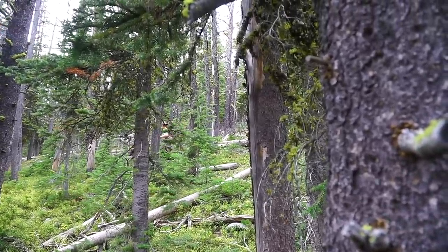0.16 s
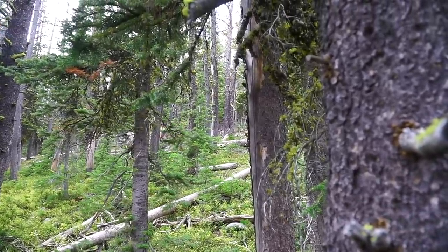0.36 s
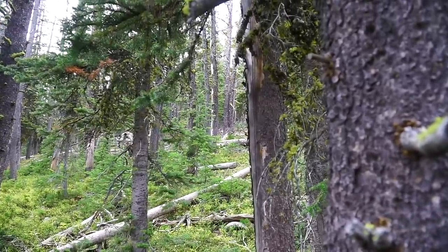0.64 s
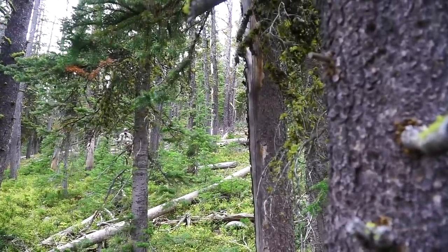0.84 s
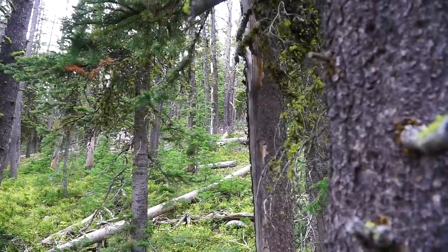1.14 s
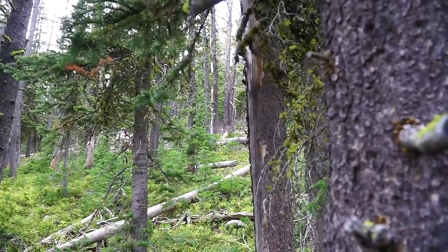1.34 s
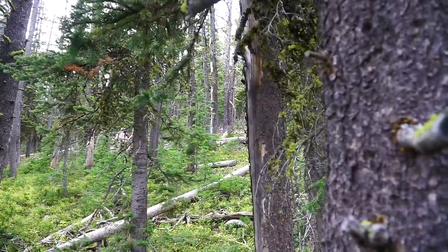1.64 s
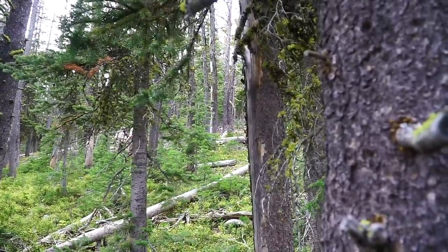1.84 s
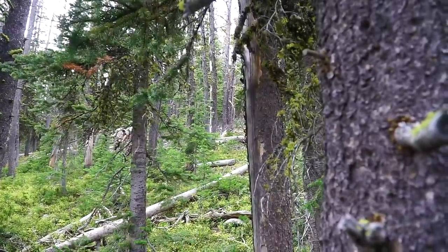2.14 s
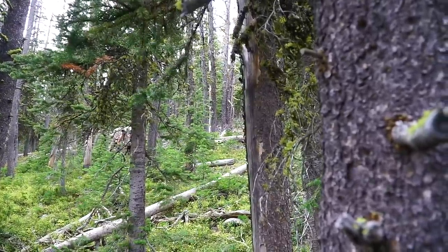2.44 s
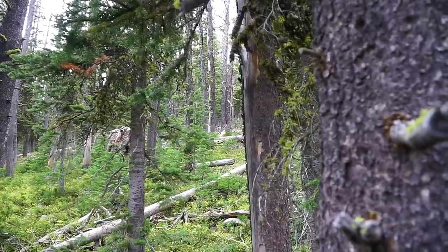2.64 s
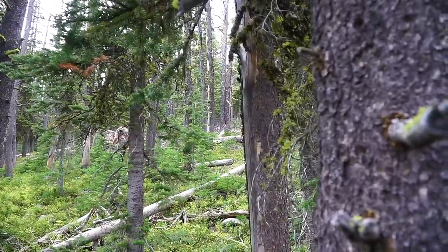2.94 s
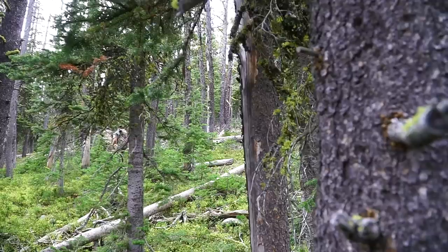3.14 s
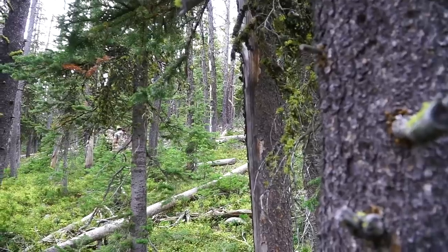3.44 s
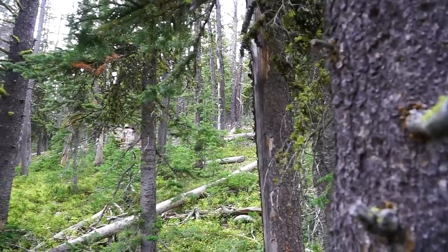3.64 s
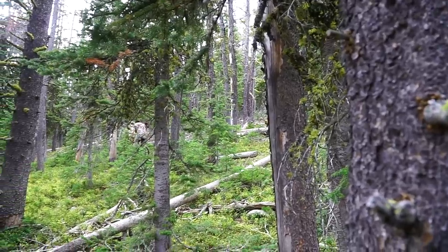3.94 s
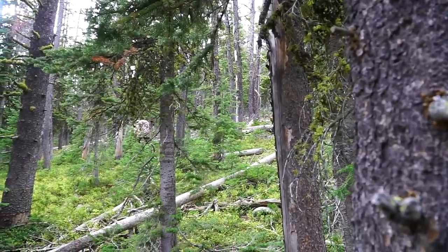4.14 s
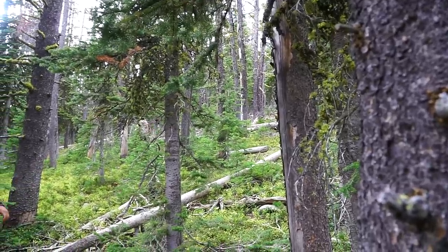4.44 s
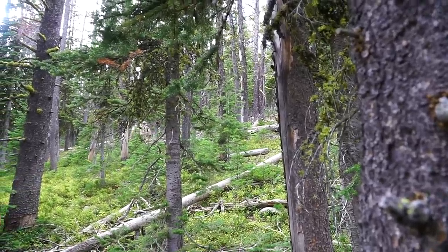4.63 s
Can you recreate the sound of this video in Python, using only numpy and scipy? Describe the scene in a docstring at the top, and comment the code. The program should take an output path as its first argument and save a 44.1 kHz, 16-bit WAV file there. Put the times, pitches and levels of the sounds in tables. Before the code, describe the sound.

A high elk call drops sharply in pitch, then two softer calls hold and fall, over faint brush rustle and small clicks.

```python
"""Three mews like a cow elk's, probably from a hunter's mouth call, sound among conifers: a thin tone,
held near 1.5 kHz, that then falls and turns rough, steeply and loudly in the first mew.
Close by, brush and cloth rustle, twigs tick and something hollow is knocked. Trunks and ground echo
the mews and the ticks. A deep rumble lies under a faint hiss of air."""
import sys
import numpy as np
from scipy import signal
from scipy.io import wavfile
from scipy.ndimage import uniform_filter1d

SR = 44100
rng = np.random.default_rng(int(sys.argv[2]) if len(sys.argv) > 2 else 0)


def waveform_to_disk(signal):
    """Save audio, clipped to [-1, 1], as 16-bit WAV at the path in sys.argv[1]."""
    frames = np.transpose(np.atleast_2d(signal))
    scaled = np.clip(frames, -1, 1) * 32767
    samples = np.round(scaled).astype(np.int16)
    wavfile.write(sys.argv[1], SR, samples)


N = 211062

# The calls, one list per mew. A partial is a pure tone at a whole multiple of the pitch.
# (time [s], pitch [Hz], first partial [dB], second partial [dB], third partial [dB], high whine [dB])
MEWS = [
    [(1.293, 1393, -50, -44, -60, -70), (1.305, 1403, -36.5, -49, -63.5, -67),
     (1.36, 1420, -38, -49.5, -52, -73), (1.385, 1442, -54, -48.5, -61, -72),
     (1.41, 1459, -39.5, -49.5, -56, -64), (1.475, 1440, -33.5, -43, -52, -53.5),
     (1.5, 1383, -18, -28, -60, -53), (1.532, 1057, -8, -25.5, -29, -57),
     (1.543, 1001, -10.5, -24, -19.5, -52), (1.562, 882, -6, -25.5, -21, -56),
     (1.587, 688.3, -24.5, -23, -25, -45), (1.61, 600.6, -15.5, -17, -36.5, -50),
     (1.632, 528, -36.5, -35, -45, -52), (1.647, 479.6, -25.5, -27.5, -38.5, -55),
     (1.68, 345, -46, -55, -39, -86)],
    [(2.64, 1124, -60, -56, -64, -70), (2.665, 1246, -42, -69, -67, -76),
     (2.685, 1327, -51, -62, -69.5, -79), (2.695, 1332, -38, -66, -76, -79),
     (2.72, 1349, -31.5, -68, -69.5, -77), (2.745, 1405, -27, -68.5, -77, -76),
     (2.775, 1478, -35.5, -69, -77, -76), (2.85, 1477, -33.5, -75, -82, -73),
     (2.99, 1577, -22.5, -49.5, -70, -72), (3.052, 1564, -23, -48.5, -69, -73),
     (3.087, 1378, -22.5, -55, -72, -72), (3.103, 1260, -31.5, -49, -50, -64),
     (3.13, 1076, -28, -55, -67, -71), (3.165, 940, -57, -47, -56, -70)],
    [(3.59, 1244, -49, -57, -63, -74), (3.62, 1290, -49, -56, -64, -66),
     (3.632, 1383, -28.5, -56, -63, -65), (3.65, 1434, -28.5, -56, -59, -63),
     (3.69, 1473, -30.5, -51, -58, -66), (3.77, 1410, -33, -53, -64, -73), (3.81, 1416, -39, -51, -65, -72),
     (3.89, 1493, -29, -48, -55, -70), (3.94, 1477, -27.5, -43.5, -61, -72),
     (3.965, 1372, -32.5, -56, -70, -64), (3.98, 1285, -52, -45, -61, -63),
     (4.0, 1200, -39.5, -48.5, -62, -67), (4.025, 1034, -42, -35, -55, -67),
     (4.045, 955, -46, -57, -58, -68), (4.062, 905, -52, -34.5, -61, -63), (4.11, 778, -57, -39, -60, -77),
     (4.15, 700, -58, -46, -74, -82)],
]
# Colour of the call's upper partials and breath: (frequency [Hz], relative level [dB])
CALL_COLOUR = [(900, 18), (1300, -5.5), (1700, -15.5), (2300, -1), (2650, -2.5), (3050, 3), (3600, -18.5),
               (4000, -13), (4500, -9), (5000, -22.5), (5400, -43.5)]
# Colour of the thin, high whine, one list per mew: (frequency [Hz], relative level [dB])
WHINES = [
    [(5000, -23), (5800, -8.5), (7000, 0.5), (7800, -11), (8600, -17), (9600, -12), (10300, -17),
     (12000, -34), (14000, -42)],
    [(5000, -32), (7200, -21), (14000, -30)],
    [(5000, -26), (5900, 2), (7300, -13), (8800, -25), (10300, -6.5), (11700, -14), (14000, -33)],
]
# Echoes from trunks and ground: (delay [s], relative level [dB])
ECHOES = [(0.009, -14), (0.024, -26)]
# Strokes against brush and cloth: (start [s], peak time [s], end [s], body [dB], treble [dB])
STROKES = [(-0.02, 0.17, 0.25, -47, -57), (0.442, 0.59, 0.65, -55, -59.5), (0.626, 0.827, 0.92, -47.5, -60),
           (0.961, 1.048, 1.295, -41.5, -56), (1.13, 1.184, 1.205, -36.5, -54.5),
           (1.34, 1.457, 2, -49.5, -63), (1.77, 1.853, 1.96, -43.5, -48), (1.926, 1.97, 2.11, -49, -56),
           (2.113, 2.12, 2.73, -53.5, -66), (2.21, 2.295, 2.43, -53.5, -56.5),
           (2.57, 2.626, 2.52, -52, -57.5), (3.153, 3.17, 3.225, -36, -44),
           (3.2, 3.225, 3.32, -49.5, -56.5), (3.415, 3.466, 3.5, -57, -68), (3.589, 3.69, 3.9, -49, -65),
           (3.96, 4.068, 4.27, -46, -67), (4.192, 4.245, 4.78, -49.5, -65),
           (4.465, 4.515, 4.6, -50.5, -55.5), (4.56, 4.776, 4.83, -55, -60.5)]
# Faint rustle that never stops: (time [s], body [dB], treble [dB], hollow band [dB])
FAINT_RUSTLE = [(0, -43.5, -65, -52.5), (.3, -46.5, -68, -57), (.6, -46, -67, -46), (.85, -50, -72, -57.5),
                (1.03, -51.5, -65, -40), (1.15, -44, -72, -43.5), (1.3, -55, -72, -58),
                (1.72, -52, -65, -59), (2.2, -61.5, -67, -86), (2.8, -52.5, -77, -57), (3.4, -52, -71, -73),
                (4.05, -66, -78, -61.5), (4.79, -51, -65, -68)]
# Colour of the rustle's body, its lower part: (frequency [Hz], relative level [dB])
RUSTLE_BODY = [(250, -1.5), (500, -7), (1000, 6), (2000, -1.5), (3000, 1), (3900, -4), (4600, -23),
               (6000, -23.5)]
# Colour of the rustle's treble: (frequency [Hz], relative level [dB])
RUSTLE_TREBLE = [(2500, -5.5), (4500, 13), (6000, 30), (8500, 11), (10500, -41), (13000, -26.5),
                 (15000, -28.5)]
# Twig ticks: (time [s], ring level [dB], ring pitch [Hz], crack [dB], thud [dB], time to fade 60 dB [s])
TICKS = [(0.219, -34, 2860, -62, -51, 0.031), (0.571, -44, 1950, -48, -59, 0.023),
         (0.591, -34, 1870, -47, -51, 0.054), (1.1634, -38, 1920, -71, -23, 0.088),
         (1.774, -35, 2950, -41, -38, 0.025), (1.917, -33, 3182, -58, -52, 0.028),
         (1.932, -27.5, 3100, -42, -51, 0.029), (1.933, -34.5, 5460, -53, -55, 0.021),
         (2.134, -41, 2370, -49, -40, 0.027), (2.191, -33, 5862, -45, -35.5, 0.034),
         (2.3022, -35, 2210, -43, -27, 0.032), (2.6222, -38, 3265, -45.5, -43, 0.026),
         (2.7533, -33, 2440, -70, -34.5, 0.028), (3.1495, -28.5, 3250, -63, -37, 0.013),
         (3.1604, -24, 3113, -56, -49, 0.015), (3.1654, -28.5, 1974, -39, -43, 0.048),
         (3.1757, -19.5, 3323, -33, -28, 0.032), (3.186, -35, 3670, -47, -39, 0.058),
         (3.2131, -31, 2300, -61, -29, 0.031), (3.2213, -30, 3364, -66, -52, 0.055),
         (3.9547, -36, 2680, -48, -38, 0.039), (4.006, -48, 6990, -55, -55, 0.02),
         (4.244, -39.5, 3010, -58, -52, 0.053), (4.3204, -45, 3260, -60, -42, 0.022)]
# Knocks on something hollow: (time [s], relative level [dB])
KNOCKS = [(1.163, -29), (1.964, -34), (2.136, -29), (2.302, -20), (2.894, -26), (3.161, -18.5),
          (3.1682, -20), (3.179, -17), (3.1875, -17), (3.2205, -16), (3.225, -19.5)]
# Tones the hollow thing rings with: (frequency [Hz], relative level [dB], time to fade 60 dB [s])
HOLLOW_TONES = [(92, -4, 0.093), (163, 1, 0.046), (261.3, 4.5, 0.059), (610, -8, 0.0084)]
# Colour of the air's hiss: (frequency [Hz], relative level [dB])
AIR = [(35, -33), (60, -4.5), (102, -4.5), (295, -11), (446, -11), (575, -14), (2300, -31), (2520, -51),
       (3900, -34), (7980, -39.5), (14900, -51.5)]
# How the rumble swells and sinks: (time [s], level [dB])
RUMBLE = [(0.0, -33), (0.53, -39.5), (1.15, -41.5), (1.28, -32), (1.38, -41.5), (1.45, -33.5),
          (1.77, -38.5), (1.84, -35), (1.92, -40), (2.37, -39), (2.72, -35), (3.26, -37), (3.53, -31),
          (3.61, -38), (4.79, -36)]


def mew_calls():
    """A thin tone with many partials falls and turns rough; breath noise follows its level."""
    waver_db, overtone_waver_db = .4, 2.5  # slow unevenness
    pitch_shake, flutter_db, rasp_hz, rasp_width_hz = .009, 4, 8300, 780  # while the pitch falls
    pitch_hz, first_db, second_db, third_db, whine_db = in_time([row for mew in MEWS for row in mew])
    t, sounding, which_mew = np.arange(N) / SR, np.zeros(N), np.zeros(N, int)
    for k, mew in enumerate(MEWS):
        start, end = mew[0][0], mew[-1][0]
        sounding[(t > start) & (t < end)] = 1
        which_mew[t > start] = k
    sounding = uniform_filter1d(sounding, size=300)
    pitch_hz = uniform_filter1d(pitch_hz, size=500)
    # The faster the pitch falls, the more the partials flutter.
    falling = np.clip(-np.gradient(np.log(pitch_hz)) * SR / 6, 0, 1)
    phase = 2 * np.pi * np.cumsum(pitch_hz * (1 + pitch_shake * falling * drift(250))) / SR
    tone = from_db(first_db + waver_db * drift(30)) * np.sin(phase)
    uneven_db = overtone_waver_db * drift(30) + .75 * flutter_db * falling * drift(120)
    tone += from_db(second_db + uneven_db) * np.sin(2 * phase + 1)
    for k in range(3, 25):
        # The call's colour makes each partial louder or softer than the third.
        colour_db = at_hz(CALL_COLOUR, k * pitch_hz) - at_hz(CALL_COLOUR, 3 * pitch_hz) - 2.26 * (k - 3)
        whine_colour_db = np.choose(which_mew, [at_hz(whine, k * pitch_hz) for whine in WHINES])
        gain = from_db(third_db + colour_db) + from_db(whine_db + whine_colour_db - 8 * falling)
        uneven_db = overtone_waver_db * drift(27) + flutter_db * falling * drift(260)
        tone += gain * from_db(uneven_db) * np.sin(k * phase + k * k)
    breath = from_db(first_db - 36) * banded_noise(CALL_COLOUR, 0, rng.standard_normal((2, N)))
    rasp = resonance(rng.standard_normal(N), rasp_hz, rasp_width_hz)
    rasp = rms_one(resonance(rasp, rasp_hz, 3 * rasp_width_hz))
    rasp *= from_db(whine_db - 3) * uniform_filter1d(falling, size=600)
    return sounding * (np.sqrt(2) * tone + breath + rasp)


def forest_echo(sound):
    """Two near echoes come back, then a dull tail scattered by many trunks."""
    tail_db, fade_s, rise_s = -21, .44, .0083
    t = np.arange(SR // 2) / SR
    tail = rng.standard_normal(len(t)) * from_db(-60 * t / fade_s) * np.minimum(t / rise_s, 1)
    tail = signal.lfilter([.4], [1, -.6], tail)  # dulls the treble
    response = from_db(tail_db) * tail / np.sqrt(np.sum(tail ** 2))
    response[0] = 1  # the direct sound
    for delay, db in ECHOES:
        response[round(delay * SR)] += from_db(db)
    return signal.fftconvolve(sound, response)[:N]


def rustle():
    """Brush and cloth rub: noise full of tiny, uneven snaps, with a hollow band that swells at times."""
    snaps_per_s, hollow_hz, hollow_width_hz = 900, 1400, 700
    body_db, treble_db, hollow_db = in_time(FAINT_RUSTLE)
    body_gain, treble_gain = brush_strokes(body_db, treble_db)
    snaps = (rng.random((2, N)) < snaps_per_s / SR) * from_db(6 * np.minimum(rng.exponential(1, N), 5))
    friction = rng.standard_normal((2, N)) * (1 + .6 * snaps)
    body = low_pass(banded_noise(RUSTLE_BODY, .9, friction), hz=4300, order=4)
    treble = banded_noise(RUSTLE_TREBLE, .9, friction)
    hollow = rms_one(double_resonance(friction[0], hollow_hz, hollow_width_hz))
    return 1.13 * body_gain * body + treble_gain * treble + from_db(hollow_db) * hollow


def brush_strokes(faint_body_db, faint_treble_db):
    """Gains of the rustle's body and treble: each stroke swells and sinks on top of the faint rustle."""
    rise_db, fall_db, edge_s = 5, 8.5, .021
    treble_swing = 1.38  # the treble moves this many times as far as the body
    t = np.arange(N) / SR
    body_power, treble_power = from_db(2 * faint_body_db), from_db(2 * faint_treble_db)
    for start, peak, end, body_db, treble_db in STROKES:
        swell_db = np.interp(t, [start, peak, end], [-rise_db, 0, -fall_db])
        edge_fade = np.clip(np.minimum(t - start, end - t) / edge_s, 0, 1)
        body_power += edge_fade * from_db(2 * (body_db + swell_db))
        treble_power += edge_fade * from_db(2 * (treble_db + treble_swing * swell_db))
    return np.sqrt(body_power), np.sqrt(treble_power)


def twig_ticks():
    """Each twig rings briefly at its own pitch, with a bright crack and a dull thud."""
    out, t = np.zeros(N), np.arange(3000) / SR
    for start, ring_db, ring_hz, crack_db, thud_db, fade_s in TICKS:
        burst = rng.standard_normal(len(t)) * from_db(-60 * t / fade_s)
        parts = (ring_db, ring_hz, .3 * ring_hz), (crack_db, 7500, 9000), (thud_db, 900, 900)
        for db, hz, width_hz in parts:
            part = double_resonance(burst, hz, width_hz)
            add(out, start, from_db(db) * part / np.abs(part).max())
    return out


def hollow_knocks():
    """Every knock sets the same low tones ringing, and they quickly die away."""
    out, t = np.zeros(N), np.arange(6000) / SR
    knock = sum(from_db(db - 60 * t / fade_s) * np.sin(2 * np.pi * hz * t)
                for hz, db, fade_s in HOLLOW_TONES)
    for start, db in KNOCKS:
        add(out, start, from_db(db - 9) * knock)
    return out


def air_hiss():
    """The air hisses faintly, with a slight flicker."""
    return from_db(-45.5) * banded_noise(AIR, .56, rng.standard_normal((2, N)))


def rumble():
    """Deep noise in one narrow band, as of distant wind or an engine."""
    deep = resonance(rng.standard_normal(N), hz=33.5, width_hz=19.5)
    deep = low_pass(deep, hz=50, order=4)
    return from_db(in_time(RUMBLE)[0]) * rms_one(deep)


def banded_noise(colour, flicker_db, noises):
    """Colour two noises in half-octave bands that flicker partly together, partly on their own."""
    out, shared_drift, edges_hz = 0, drift(8), 50 * 2 ** np.arange(0, 8.6, .5)
    for k, (low, high) in enumerate(zip(edges_hz, edges_hz[1:])):
        band = signal.sosfilt(signal.butter(2, [low, high], "band", fs=SR, output="sos"), noises[k % 2])
        band_db = at_hz(colour, np.sqrt(low * high)) + flicker_db * (shared_drift + drift(54))
        out = out + band * from_db(band_db)
    return rms_one(out)


def drift(rate):
    """A smooth random wobble of typical size 1 that changes about rate times a second."""
    step, warm_up = 40, 2000
    r = np.exp(-2 * np.pi * step * rate / SR)
    noise = rng.standard_normal(N // step + warm_up + 2)
    slow = signal.lfilter([1], [1, -2 * r, r * r], noise)[warm_up:]
    return np.interp(np.arange(N) / step, np.arange(len(slow)), rms_one(slow))


def resonance(x, hz, width_hz):
    """Let through the band around one frequency."""
    r = np.exp(-np.pi * width_hz / SR)
    feedback = [1, -2 * r * np.cos(2 * np.pi * hz / SR), r * r]
    return signal.lfilter(np.array([1, 0, -1]) * (1 - r * r) / 2, feedback, x)


def double_resonance(x, hz, width_hz):
    """The same resonance twice, for a band with steeper sides."""
    return resonance(resonance(x, hz, width_hz), hz, width_hz)


def low_pass(x, hz, order):
    """Soften everything above hz; a higher order cuts more steeply."""
    return signal.sosfilt(signal.butter(order, hz, fs=SR, output="sos"), x)


def from_db(db):
    """Turn decibels into a gain to multiply by."""
    return 10 ** (np.asarray(db) / 20)


def rms_one(x):
    """Scale a signal so its average strength (rms) is 1."""
    return x / np.sqrt(np.mean(x ** 2) + 1e-20)


def in_time(rows):
    """Turn each column after the time into a curve over all samples."""
    times, *columns = np.transpose(rows)
    return [np.interp(np.arange(N) / SR, times, column) for column in columns]


def at_hz(colour, hz):
    """Look up a colour table's level at a frequency, with octaves evenly spaced."""
    frequencies, levels_db = np.transpose(colour)
    return np.interp(np.log(hz), np.log(frequencies), levels_db)


def add(out, start_s, sound):
    """Mix a short sound in at a given time."""
    i = round(start_s * SR)
    out[i:i + len(sound)] += sound[:N - i]


def scene():
    """Mews and twigs in the forest's echo, over knocks, rustle, air and rumble, in one channel."""
    air = air_hiss()
    return (forest_echo(mew_calls() + twig_ticks()) + hollow_knocks() + rustle() + air + rumble())[None]


def record(dry):
    """The microphone dulls the highest treble, the loudest peaks are gently rounded, the top is cut."""
    ceiling, cutoff_hz = 1.12, 15300
    dull = low_pass(dry, hz=11900, order=2)
    rounded = dull / (1 + np.abs(dull / ceiling) ** 4) ** (1 / 4)
    return signal.sosfilt(signal.cheby2(12, 70, cutoff_hz, fs=SR, output="sos"), rounded)


dry = scene()
out = record(dry)
waveform_to_disk(out)
```